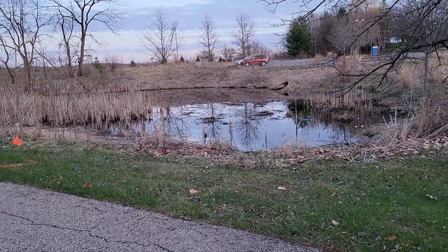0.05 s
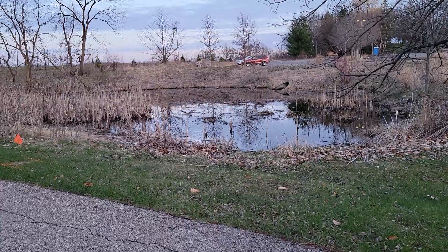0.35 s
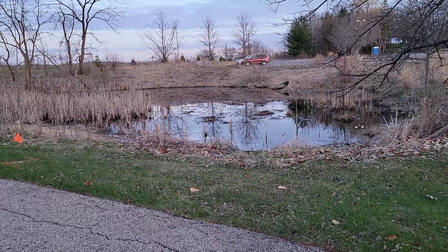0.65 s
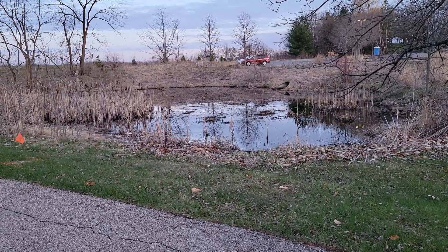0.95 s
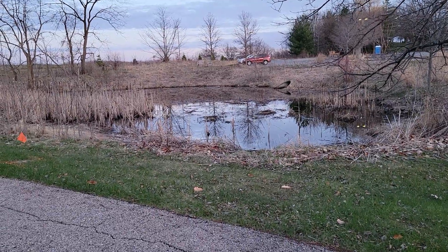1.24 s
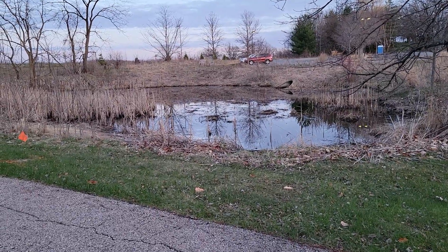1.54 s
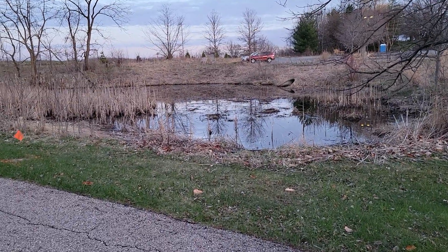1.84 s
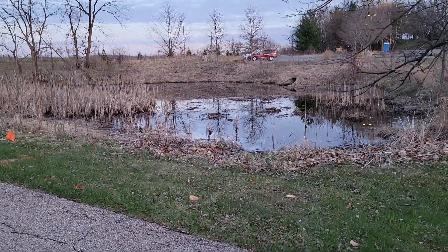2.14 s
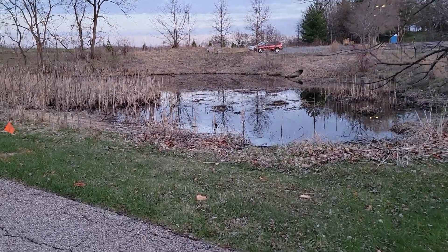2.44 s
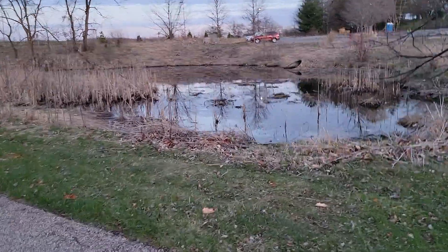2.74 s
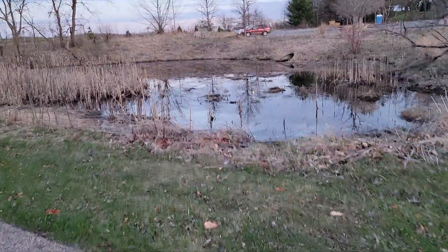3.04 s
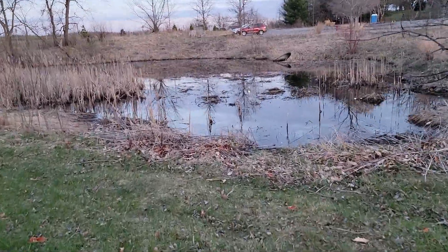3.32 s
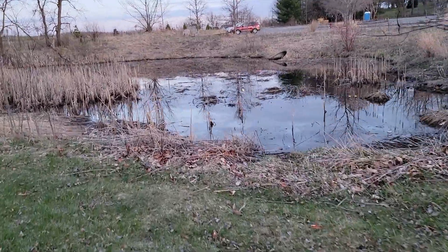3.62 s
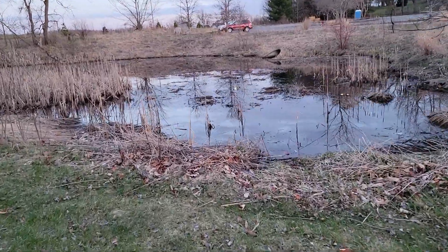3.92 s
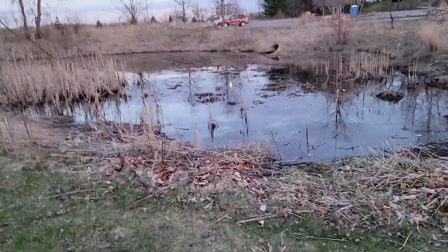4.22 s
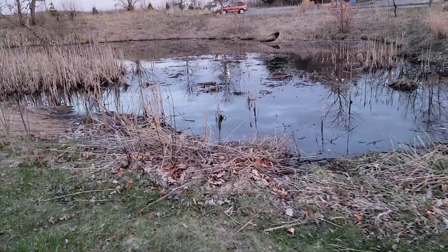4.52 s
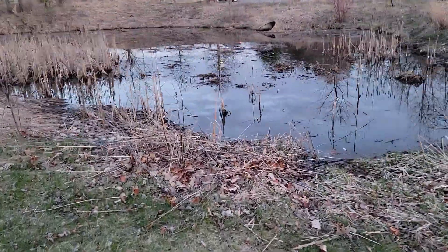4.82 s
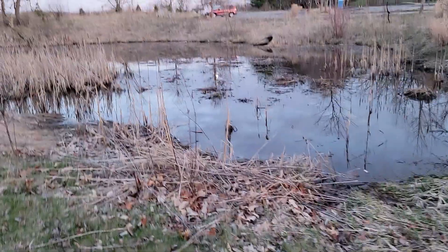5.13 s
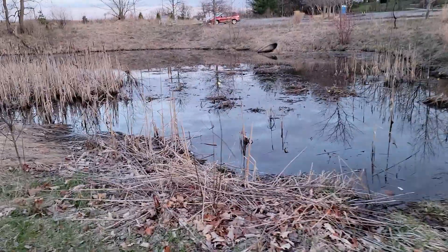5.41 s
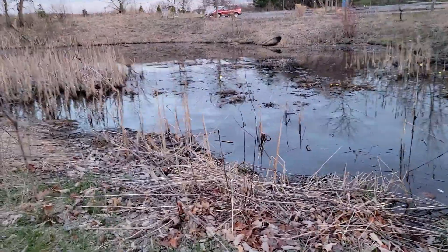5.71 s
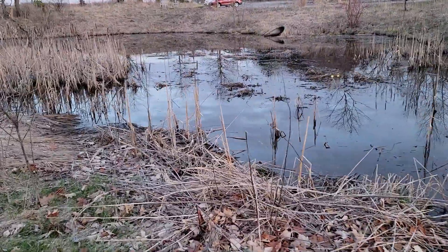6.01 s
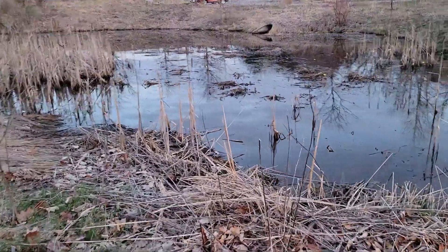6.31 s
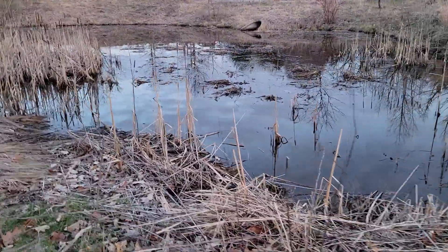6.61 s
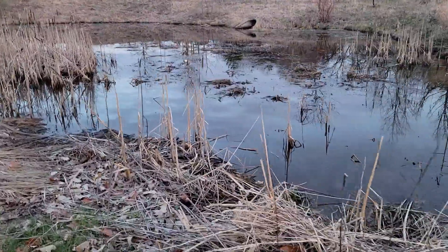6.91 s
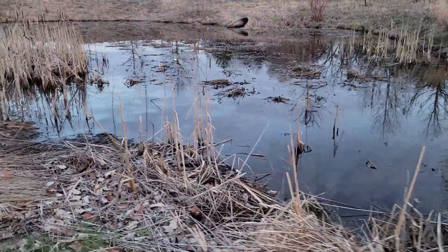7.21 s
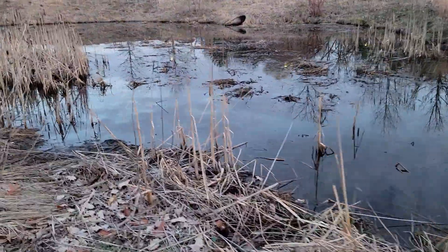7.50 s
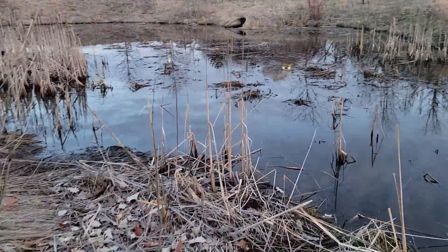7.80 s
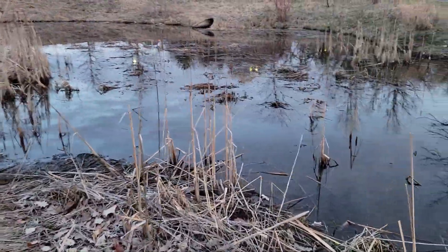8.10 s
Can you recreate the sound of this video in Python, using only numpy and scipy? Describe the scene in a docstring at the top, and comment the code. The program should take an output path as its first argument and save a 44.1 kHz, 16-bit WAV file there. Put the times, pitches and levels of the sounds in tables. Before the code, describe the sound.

Small frogs call without pause at a reedy pond, each call a quick run of high clicks that climbs in pitch. Close frogs overlap and take turns over a bed of distant ones. A stereo microphone is carried toward the water, and quiet footsteps thud on grass, then crunch through dry leaves and snap reed stalks in the second half. Faint traffic rumbles beyond the pond, growing a little near the end.

```python
"""Small frogs trill, close and far, at a reedy roadside pond in spring, as a stereo microphone is walked
down to the edge. Each call is a run of clicks, short rings of the vocal sac, that climbs in pitch; the
near frogs take turns over a bed of distant ones. Below the microphone, steps thud on the lawn, then
crunch in dry leaves and reed stalks. Beyond the water, traffic rumbles and a vehicle draws nearer."""
import sys
import numpy as np
from scipy import signal
from scipy.fft import rfft, irfft, next_fast_len
from scipy.io import wavfile
from scipy.ndimage import uniform_filter1d, map_coordinates

SR = 44100
rng = np.random.default_rng(int(sys.argv[2]) if len(sys.argv) > 2 else 0)


def generate_wav(signal):
    """Clip the signal to [-1, 1] and save it as 16-bit WAV at the path in sys.argv[1]."""
    frames = np.transpose(np.atleast_2d(signal))
    scaled = np.clip(frames, -1, 1) * 32767
    pcm = np.round(scaled).astype(np.int16)
    wavfile.write(sys.argv[1], SR, pcm)


N = 359415
TIME = np.arange(N) / SR

# Diffuse sound at the microphone. Each row: frequency in Hz, left-right correlation.
STEREO_LIKENESS = [(130, 1), (300, 0.9), (640, 0.43), (1400, 0.47), (6000, 0.086)]
# The road beyond the pond. Each row: time in seconds, tyre level in dB, engine level in dB,
# tilt of the engine notes in dB per octave.
ROAD_LEVELS = [(0, -62, -53.5, -5), (4.3, -59, -53, -4), (5.6, -52.5, -51, 3), (6.8, -49.5, -48, -0.5),
               (7.4, -44.5, -44, -5), (7.8, -44.5, -43, 10.5), (8.15, -47, -41.5, 6)]
# One engine's hum. Each row: pitch in Hz, level against the engine in dB before the tilt.
ENGINE_HUM = [(122, -11), (220, -6.5), (560, -21.5)]
# Noise colours, from the road to the ground underfoot. Each row: frequency in Hz, relative density in dB.
RUMBLE_SPECTRUM = [(20, -25), (40, -5.5), (56, -0.5), (80, -4), (125, -3), (200, -15.5), (400, -33.5)]
ENGINE_SPECTRUM = [(100, -8), (200, 0.5), (280, -2.5), (370, -15), (600, -26), (1000, -34)]
TYRE_SPECTRUM = [(250, -6.5), (480, 5.5), (750, -1.5), (1200, 2), (2200, -4.5), (4000, -10), (8000, -25),
                 (16000, -36.5)]
FROG_RASP_SPECTRUM = [(1200, -6), (1400, 2), (1750, 0.5), (2100, -3), (2450, -14.5), (4000, -15),
                      (4800, -18), (6000, -27.5), (11000, -57)]
TURF_SPECTRUM = [(200, -2), (500, -4.5), (900, -5), (1400, 2), (2200, -8.5), (5000, -17), (12000, -38)]
LEAF_SPECTRUM = [(300, -6), (700, 6), (1400, 13.5), (2600, 8), (5000, 7.5), (7500, 4), (10000, -4),
                 (14000, 3), (16000, -4.5)]
# The distant frogs together. Each row: time in seconds, relative level in dB, middle pitch in Hz.
FAR_CHORUS = [(0.35, -33.5, 3294), (0.54, -35, 3015), (1.02, -35, 3334), (1.43, -36.5, 3140),
              (1.92, -36.5, 3160), (2.4, -33.5, 3215), (2.55, -33.5, 3280), (3.52, -35.5, 3133),
              (3.85, -36, 3244), (4.36, -37, 2994), (4.67, -41, 3300), (4.95, -37, 3230),
              (5.01, -36.5, 3123), (8.1, -38, 3207)]
# Heels on soft turf. Each row: time of the peak in seconds, level in dB, twice the rise in seconds.
HEEL_STRIKES = [(3.052, -44.5, 0.034), (3.332, -47.5, 0.019), (3.538, -49.5, 0.036), (4.022, -50.5, .04),
                (4.533, -33, 0.0057), (5.037, -50, 0.035), (5.397, -41.5, 0.032), (7.657, -41.5, 0.14)]
# Feet and legs pressing dry leaves. Each row: time of the peak in seconds, level in dB, rise in seconds.
LEAF_CRUNCHES = [(.81, -65, .043), (1.78, -58, 0.028), (4.943, -49, 0.016), (5.059, -49, .04),
                 (5.41, -39, 0.042), (5.47, -42.5, 0.062), (5.575, -45.5, 0.053), (5.96, -49, 0.14),
                 (6.426, -48.5, 0.012), (6.53, -46.5, 0.076), (6.72, -47.5, 0.087), (7.015, -51, .028),
                 (7.115, -46, .038), (7.32, -51, 0.089), (7.688, -41, 0.072), (8.05, -58, 0.12)]
# Faint rustle between steps, on the lawn and then in the reeds. Each row: time in seconds, level in dB.
LEAF_STIR = [(4.3, -80.5), (6.5, -69)]
# Dry stalks that snap or scrape. Each row: time of the peak in seconds, level in dB, ring in Hz,
# twice the rise in seconds.
STALK_SNAPS = [(1.752, -36.5, 4670, 0.0018), (5.203, -38, 4770, 0.0021), (5.429, -38.5, 4600, 0.032),
               (5.585, -49, 7100, 0.002), (5.988, -49.5, 5400, .02), (7.197, -33, 4170, 0.0087)]
# A click's partials. Each row: multiple of the sac pitch, relative dB in a near frog, the same in a far one.
CLICK_PARTIALS = [(0.498, -20.5, -11.5), (1, -1.5, 3.5), (1.514, -29.5, -22), (2.021, -45, -34),
                  (2.518, -57, -48.5), (3, -65, -65)]
# Where the near frogs sit. Each row: time in seconds, lag of the right channel in microseconds.
NEAR_BEARING = [(.2, 21), (.6, -100), (1.6, -30), (3.8, -25.5), (4.6, 2.5), (5.3, 79.5), (6.7, 4),
                (7.2, 101)]
# Calls close to the microphone. Each row: first and last click in seconds, number of clicks, last gap over
# first gap, first and last pitch in Hz, relative level at the crest in dB, left over right in dB.
NEAR_TRILLS = [(-.302, .233, 11, 1.24, 3100, 3370, -16, 1), (-.29, 0.28, 11, 1.45, 3000, 3230, -19, -15),
               (-.237, 0.355, 11, 1.32, 3280, 3310, -17.5, -1), (-.182, .395, 11, 1.33, 3160, 3460, -20, 3),
               (0.406, .933, 10, 1.61, 2914, 3175, -14, -2), (0.468, 1.049, 11, 1.42, 3040, 3484, -14, -4),
               (0.621, 1.198, 11, 1.42, 3280, 3600, -28, 1),
               (1.010, 1.645, 13, 1.45, 2830, 3310, -18.5, -2),
               (1.192, 1.803, 12, 1.68, 2985, 3320, -15, -3),
               (1.413, 1.886, 9, 1.52, 3070, 3327, -15.5, -6.5),
               (1.773, 2.35, 12, 1.56, 2760, 3170, -24.5, -9),
               (2.008, 2.585, 11, 1.55, 2970, 3446, -14, -7.5),
               (2.106, 2.594, 10, 1.48, 3170, 3360, -16, -7.5),
               (2.199, 2.705, 9, 1.22, 3250, 3550, -20, -1), (2.449, 2.899, 10, 1.2, 2790, 3100, -24.5, -8),
               (2.623, 3.076, 9, 1.52, 2950, 3240, -13, -7.5),
               (2.801, 3.372, 12, 1.57, 3050, 3450, -18.5, -1.5),
               (3.171, 3.792, 13, 1.37, 2890, 3194, -15, -6.5),
               (3.441, 3.973, 11, 1.42, 3130, 3430, -17.5, -4),
               (3.593, 4.078, 10, 1.01, 3170, 3394, -18, -2), (3.619, 4.101, 8, 1.07, 3110, 3300, -18, -4),
               (4.179, 4.629, 9, 1.34, 3020, 3270, -18, -6),
               (4.259, 4.789, 11, 1.47, 2973, 3276, -13.5, -4.5),
               (4.342, 4.879, 10, 1.45, 3075, 3470, -18, -1),
               (4.44, 4.993, 11, 1.3, 3220, 3560, -21.5, 2.5), (4.910, 5.365, 9, 1.3, 2840, 3270, -24, -3),
               (5.061, 5.602, 12, 1.48, 2990, 3240, -18, -2),
               (5.652, 6.032, 7, 1.34, 2860, 3260, -15.5, -2), (5.81, 6.19, 7, 1.26, 2970, 3300, -17.5, -1),
               (6.283, 6.894, 13, 1.59, 2970, 3340, -13, -2), (6.57, 7.127, 11, 1.33, 3120, 3560, -21, 3),
               (7.011, 7.570, 11, 1.24, 2930, 3200, -17.5, 1), (7.77, 8.113, 8, 1.26, 2860, 3220, -18.5, 0),
               (7.821, 8.044, 5, 1.17, 2910, 2950, -20.5, -6)]


def from_db(db):
    return 10 ** (np.asarray(db) / 20)


def unit_rms(x):
    return x / np.sqrt(np.mean(x ** 2) + 1e-20)


def curve(rows, t=TIME):
    """The columns of a table, read at times t."""
    times, *columns = np.transpose(rows)
    return [np.interp(t, times, column) for column in columns]


def at_hz(rows, hz):
    points_hz, values = np.transpose(rows)
    return np.interp(np.log(hz), np.log(points_hz), values)


def panned(left_db):
    return from_db(np.array([[left_db], [-left_db]]) / 2)


def drift(turns_per_s):
    """A random wander of rms 1."""
    knots = rng.standard_normal(2000)
    return unit_rms(map_coordinates(knots, [TIME * turns_per_s], order=1, mode="wrap"))


def coloured(white, spectrum):
    """Two unrelated signals become a stereo pair with this spectrum, alike in the bass; rms 1."""
    size = next_fast_len(N)
    hz = np.maximum(np.arange(size // 2 + 1) * SR / size, 1)
    skirts = 1 / (1 + (spectrum[0][0] / hz) ** 4) / (1 + (hz / spectrum[-1][0] / 2) ** 4)
    mid, side = rfft(white, size) * from_db(at_hz(spectrum, hz)) * skirts
    alike = at_hz(STEREO_LIKENESS, hz)
    pair = np.sqrt(1 + alike) * mid + np.sqrt(1 - alike) * side * [[1], [-1]]
    return unit_rms(irfft(pair, size)[:, :N])


def noise(spectrum):
    return coloured(rng.standard_normal((2, N)), spectrum)


def resonance(x, hz, width_hz):
    radius = np.exp(-np.pi * width_hz / SR)
    return signal.lfilter([1, 0, -1], [1, -2 * radius * np.cos(2 * np.pi * hz / SR), radius ** 2], x)


def swell(t, rise_s, steepness):
    """Grows from nothing over rise_s, reaches 1 at t = 0 and dies away more slowly."""
    age = np.clip(1 + t / rise_s, 1e-9, 40)
    return np.exp(steepness * (np.log(age) + 1 - age))


def add(out, sound, start_s):
    at = int(round(start_s * SR))
    low, high = max(at, 0), min(at + sound.shape[1], N)
    if high > low:
        out[:, low:high] += sound[:, low - at:high - at]


def road(right_lag_s=0.00029):
    """Rumble and tyre hiss from beyond the pond, a little louder on the right, with the wavering notes of one
    engine."""
    tyre_db, engine_db, tilt = curve(ROAD_LEVELS)
    notes = np.zeros(N)
    for hz, db in ENGINE_HUM:
        gain = from_db(db + tilt * np.log2(hz / 220) + 5.2 * drift(22))
        wavering_hz = hz * (1 + 0.02487 * drift(14))
        notes += gain * np.sin(2 * np.pi * np.cumsum(wavering_hz) / SR)
    engine = from_db(engine_db) * (from_db(0.5) * noise(ENGINE_SPECTRUM) + notes)
    rumble = from_db(-48 + drift(5.7)) * noise(RUMBLE_SPECTRUM)
    tyres = from_db(tyre_db) * noise(TYRE_SPECTRUM) * panned(left_db=-3.5)
    left, right = rumble + engine + tyres
    return np.array([left, np.interp(TIME - right_lag_s, TIME, right)]) * panned(left_db=-0.9)


def reed_echoes(x, t60_s, echoes_per_s):
    """Stalks and banks scatter a short trail of echoes, whose paths change as the microphone moves."""
    out, t = np.zeros((2, N)), TIME[:SR // 5]
    decay = from_db(-60 * t / t60_s) * (t > .003)
    for start_s in np.arange(0, TIME[-len(t) // 2], t[-1] / 2):
        piece = x[:, int(start_s * SR):][:, :len(t)]
        fade = np.sin(np.pi * t / t[-1])[:piece.shape[1]]
        trail = decay * rng.standard_normal((2, len(t))) * (rng.random((2, len(t))) < echoes_per_s / SR)
        trail /= np.linalg.norm(trail, axis=1, keepdims=True)
        add(out, signal.fftconvolve(piece * fade, trail, axes=1), start_s)
    return out


def trill(first_s, last_s, count, slowing, first_hz, last_hz, level_db, left_db, swell_db=9, crest=.85):
    """One call slows, swells and climbs. Each row is a click: seconds, dB, Hz, left over right in dB."""
    along = np.linspace(0, 1, count)
    uneven_db, uneven_hz, uneven_pan = rng.standard_normal((3, count)) * [[1], [20], [2.5]]
    gaps = 1 + (slowing - 1) * np.sin(np.linspace(0, np.pi / 2, count - 1)) ** 2
    times = first_s + (last_s - first_s) * np.append(0, np.cumsum(gaps)) / gaps.sum()
    db = level_db - swell_db * (1 - along / crest) ** 2 + uneven_db
    hz = first_hz + (last_hz - first_hz) * along + uneven_hz
    clicks = np.transpose([times, db, hz, left_db + uneven_pan])
    return clicks[(times > 0) & (times < N / SR)]


def frog_clicks(clicks, lags_s, partial_db, sac_rise_s, length_spread_db, colour_spread_db):
    """The larynx gives a brief stack of partials; the sac, tuned to the second, rings on longer."""
    out, t = np.zeros((2, N)), np.arange(-220, 540) / SR
    taper = np.cos(np.pi / 2 * np.maximum(t / t[-1], 0) ** 4) ** 2
    multiple = np.array(CLICK_PARTIALS)[:, :1]
    is_sac = multiple == 1
    length_share = np.where(is_sac, 1, .72)
    for (time_s, level_db, hz, left_db), lag_s in zip(clicks, lags_s):
        stretch, slip = rng.standard_normal(2)
        colour, phase = rng.standard_normal((2, len(multiple), 1))
        rise_s = sac_rise_s * from_db(length_spread_db * np.clip(stretch, -2, 2))
        envelope = taper * swell(t + rise_s * (1 - length_share), rise_s * length_share, steepness=2.8)
        slide_per_s = 2.2 * slip - 0.8   # the pitch slides a little as the sac relaxes
        cycles = hz * (t + slide_per_s * t * t / 2)
        gain = from_db(level_db + partial_db[:, None] + colour_spread_db * colour * ~is_sac)
        ring = np.sum(gain * envelope * np.exp(2j * np.pi * (multiple * cycles + phase)), axis=0)
        stereo_phase = np.exp(1j * np.pi * hz * lag_s * np.array([[1], [-1]]))
        pan = panned(left_db)
        energy = np.mean(pan ** 2) * rise_s / sac_rise_s
        add(out, (ring * stereo_phase).real * pan / np.sqrt(energy), time_s + t[0])
    low_cut = signal.butter(4, 1380, "high", fs=SR, output="sos")   # so small a body radiates no bass
    return signal.sosfilt(low_cut, out + 1e-18)


def far_trills(frogs, length_s=.85, rest_s=.36, climb_hz=350, pitch_spread_hz=135):
    """Each far frog trills, rests and trills again from its own place; gives clicks and stereo lags."""
    clicks, lags_s = [], []
    for turn in np.arange(frogs) / frogs:   # neighbours take turns
        voice, side, bearing = rng.standard_normal(3)
        start = -(length_s + rest_s) * turn
        for stretch, pause in rng.standard_normal((9, 2)):
            end = start + length_s * (1 + .06 * stretch)
            hz = curve(FAR_CHORUS, (start + end) / 2)[1] + pitch_spread_hz * np.tanh(voice)
            call = trill(start, end, count=17, slowing=1.5, first_hz=hz - climb_hz / 2,
                         last_hz=hz + climb_hz / 2, level_db=0, left_db=3 * side - 4.5)
            clicks.extend(call)
            lags_s += [90e-6 * bearing] * len(call)
            start = end + rest_s + .1 * pause
    return clicks, lags_s


def far_frogs():
    """Distant trills to the right, blurred by the reeds; the farthest frogs merge into one rasp."""
    clicks, lags_s = far_trills(frogs=14)
    direct = frog_clicks(clicks, lags_s, np.array(CLICK_PARTIALS)[:, 2],
                         sac_rise_s=0.0024, length_spread_db=2, colour_spread_db=4.5)
    bed = direct + from_db(-7.5) * reed_echoes(direct, t60_s=.26, echoes_per_s=2500)
    running_rms = np.sqrt(uniform_filter1d(np.mean(bed ** 2, axis=0), size=SR // 6) + 1e-12)
    rasp = from_db(-17.5 + 2.47 * drift(90)) * noise(FROG_RASP_SPECTRUM) * panned(left_db=-5)
    return from_db(curve(FAR_CHORUS)[0] + 1) * (bed / running_rms + rasp)


def heels(flutter_db=3.5):
    """Below the microphone, a heel presses the turf with a short dull scuff."""
    weight = sum(from_db(db) * swell(TIME - peak_s, length_s / 2, steepness=1.2)
                 for peak_s, db, length_s in HEEL_STRIKES)
    return weight * from_db(flutter_db * np.tanh(drift(150))) * noise(TURF_SPECTRUM)


def cracks(per_s):
    """Random clicks of very unequal size, different in each channel; rms 1."""
    sizes = from_db(4.5 * np.minimum(rng.exponential(1, N), 3))
    return unit_rms(sizes * (rng.random(N) < per_s / SR) * np.tanh(rng.standard_normal((2, N))))


def leaves():
    """Dry leaves break underfoot in clumps of tiny cracks and a few sharper snaps, over a soft hiss."""
    crunch_power = sum((from_db(db) * swell(TIME - peak_s, rise_s, steepness=2.23)) ** 2
                       for peak_s, db, rise_s in LEAF_CRUNCHES)
    weight = np.sqrt(crunch_power + from_db(curve(LEAF_STIR)[0]) ** 2)
    grains = cracks(per_s=1500) + cracks(per_s=160) + from_db(-4) * rng.standard_normal((2, N))
    clumps = from_db(2.3 * drift(70))
    return weight * clumps * coloured(grains, LEAF_SPECTRUM) * panned(left_db=-1)


def stalks():
    """Close by, a hollow reed splinters and rings broadly."""
    out, t = np.zeros((2, N)), TIME[:SR // 5]
    for peak_s, db, hz, length_s in STALK_SNAPS:
        rise_s, width_hz = length_s / 2, 0.29 * hz
        splinters = rng.standard_normal((2, len(t)))
        ring = unit_rms(resonance(resonance(splinters, hz, width_hz), hz, width_hz))
        add(out, from_db(db) * ring * swell(t - rise_s, rise_s, steepness=0.43), peak_s - rise_s)
    return out


def near_frogs():
    """The callers closest to the microphone, clear and nearly free of echo."""
    clicks = np.vstack([trill(*call) for call in NEAR_TRILLS])
    lags_s = (curve(NEAR_BEARING, clicks[:, 0])[0] + rng.normal(0, 33, len(clicks))) / 1e6
    direct = frog_clicks(clicks, lags_s, np.array(CLICK_PARTIALS)[:, 1],
                         sac_rise_s=0.0029, length_spread_db=2.24, colour_spread_db=3)
    return from_db(-0.37) * direct + from_db(-12) * reed_echoes(direct, t60_s=0.09, echoes_per_s=700)


def scene():
    """Frogs, footsteps and road as they meet at the microphone."""
    return near_frogs() + far_frogs() + leaves() + heels() + stalks() + road()


def record(dry, start_s=.081, cutoff_hz=15900):
    """The sound opens after a moment of near silence; the highest treble is cut."""
    fade_in = np.clip((TIME - start_s) / .002, from_db(-60), 1)
    return signal.sosfilt(signal.ellip(12, .1, 90, cutoff_hz, fs=SR, output="sos"), dry * fade_in)


dry = scene()
out = record(dry)
generate_wav(out)
```